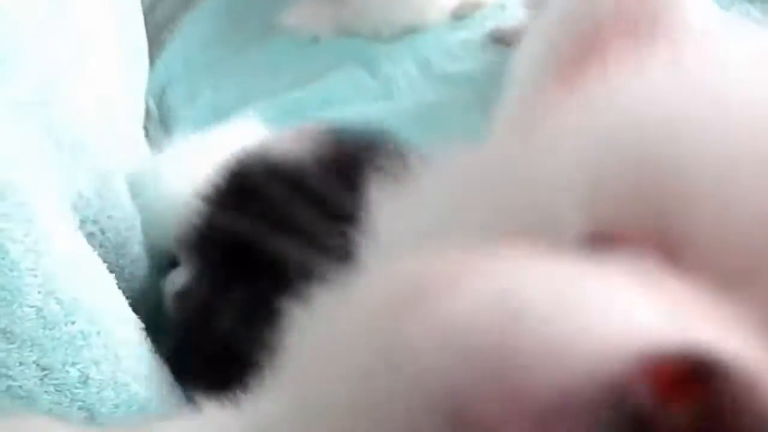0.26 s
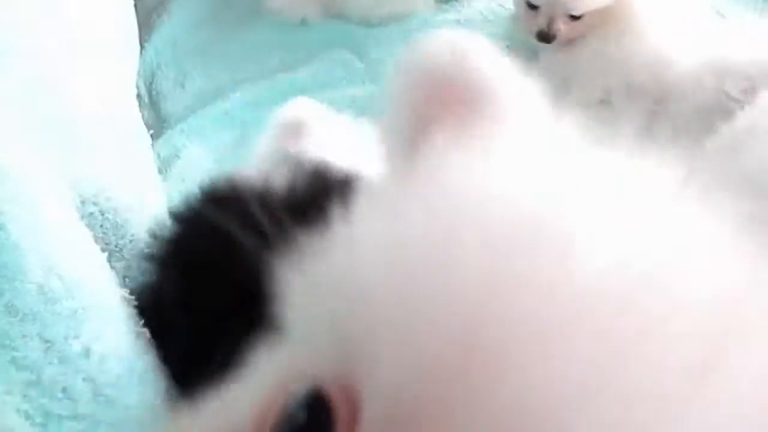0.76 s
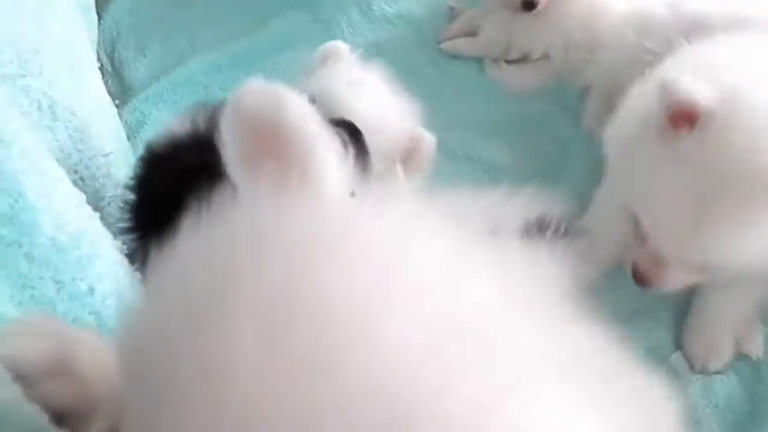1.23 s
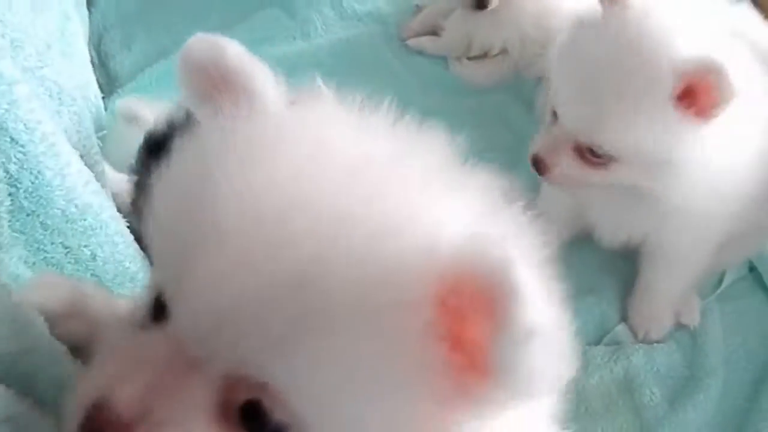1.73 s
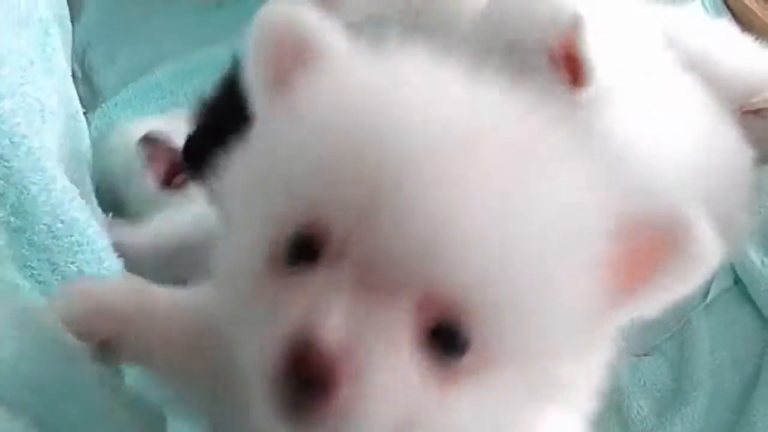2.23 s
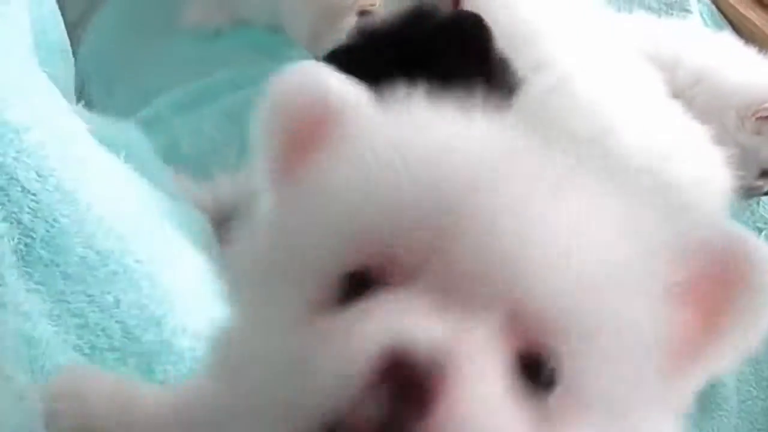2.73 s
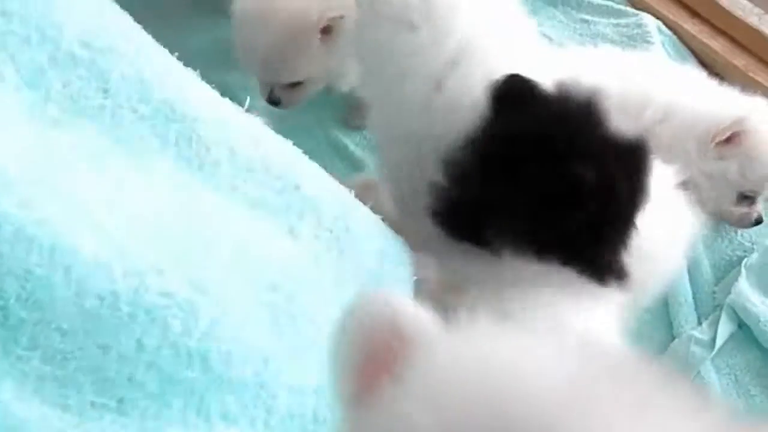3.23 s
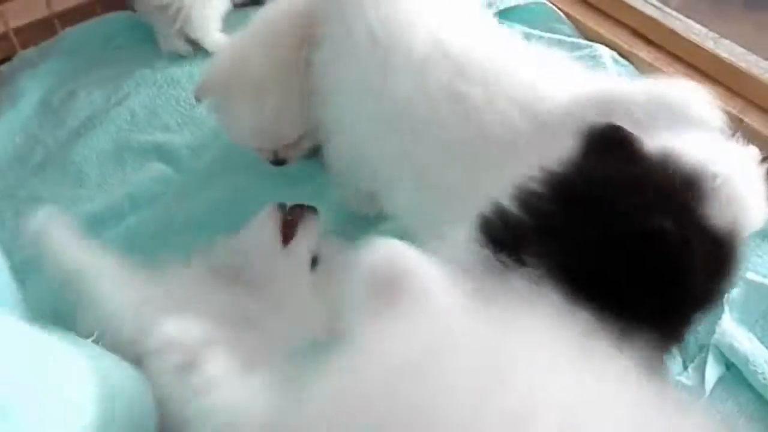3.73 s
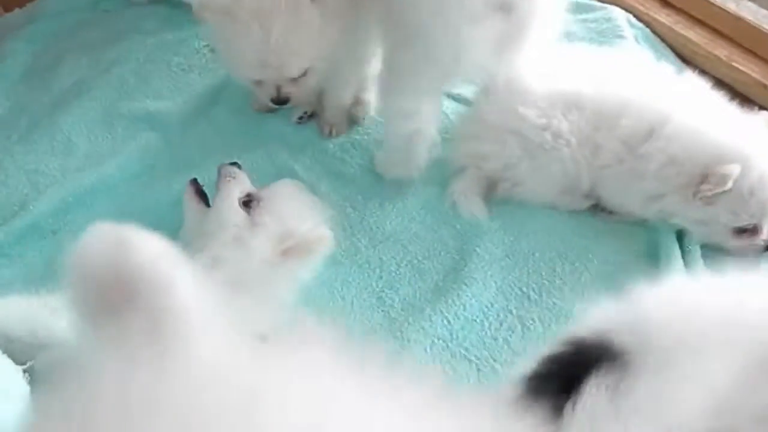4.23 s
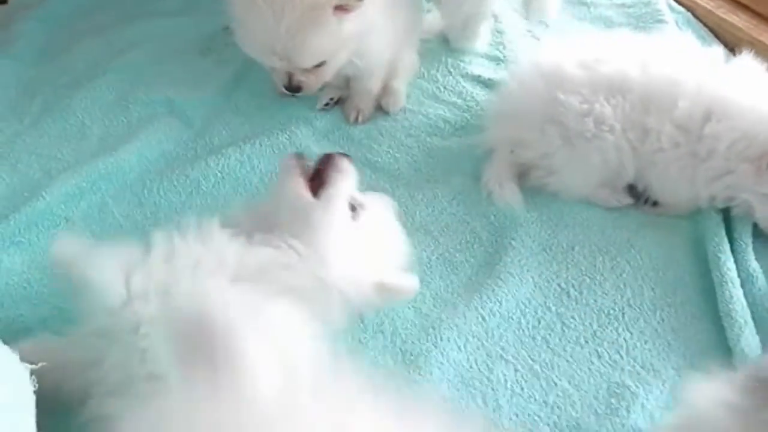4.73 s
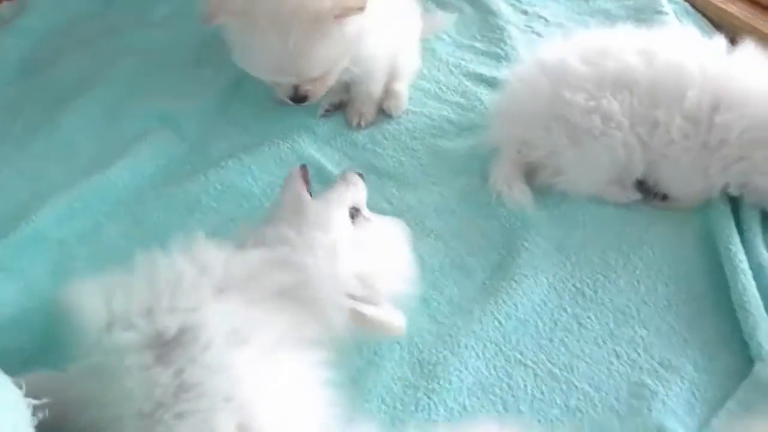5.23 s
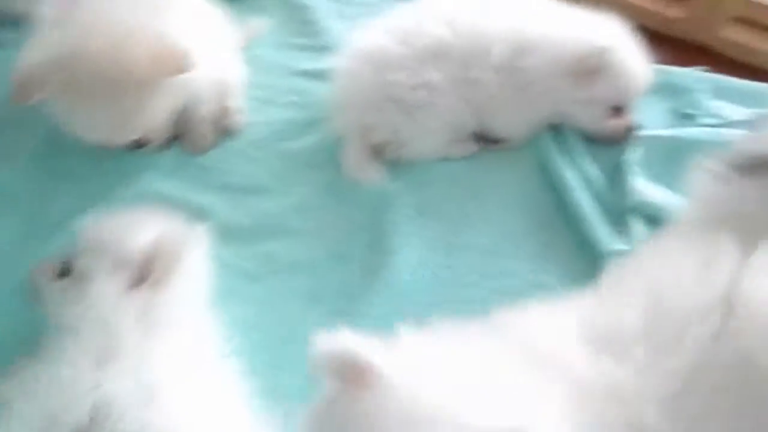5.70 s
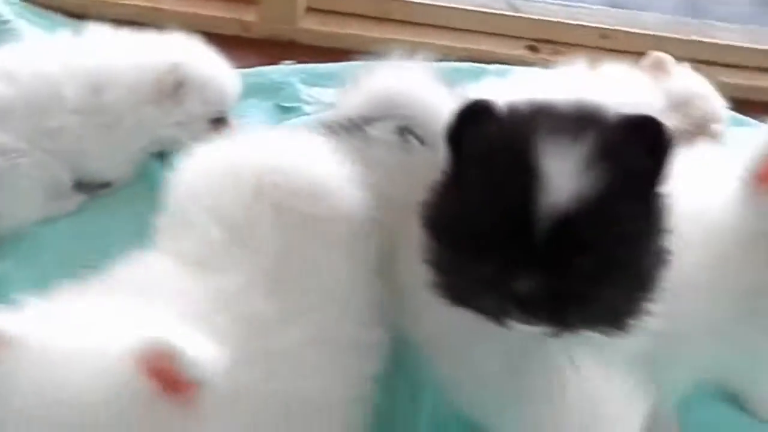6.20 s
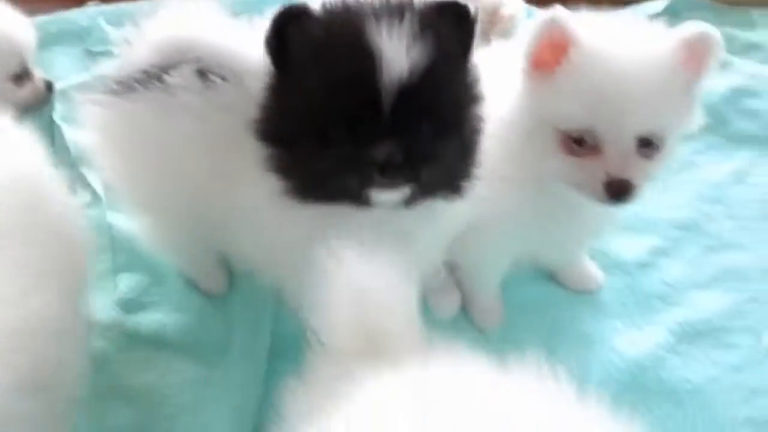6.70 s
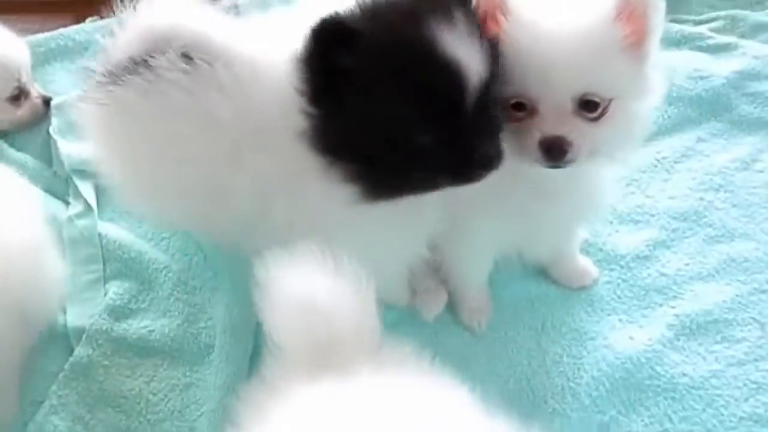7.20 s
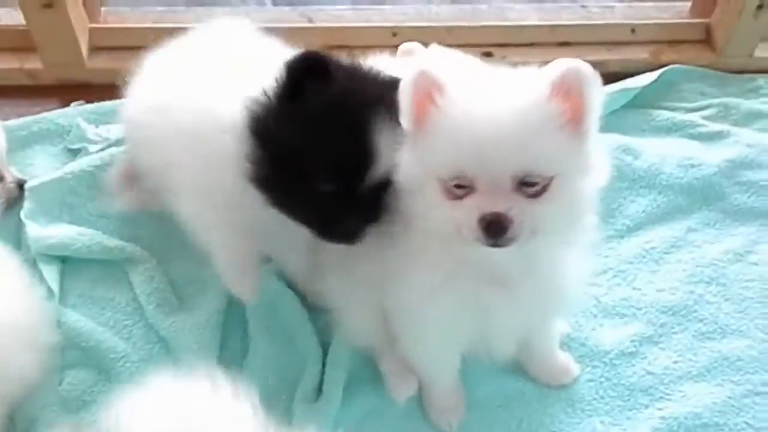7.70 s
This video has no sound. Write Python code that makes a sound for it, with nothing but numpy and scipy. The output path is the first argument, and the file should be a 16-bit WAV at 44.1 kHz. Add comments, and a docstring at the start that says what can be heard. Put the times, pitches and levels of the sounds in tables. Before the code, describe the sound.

Heard from very close in a small furnished room, a puppy yips sharply and bursts into a ragged, squeaky snarl with a hoarse bark. After a pause comes a soft closed-mouth moan, then a piercing thin whine that trembles and fades. Weaker whines, a short squeal and a tiny peep follow. Faint claw ticks and dull paw thuds on padding come later, over a low wavering appliance hum that dips under the first whine.

```python
"""An indoor pen: puppies play on a blanket, heard from close by.
One yelps, squeaks, snarls and growls, then whines follow in long thin squeals: all are stacks of
vocal-fold partials coloured by throat and mouth, with puffs of noise for the breath.
Claws tick and paws thud as short decaying noise bursts. An appliance hums as wavering tones over
noise for the room's air; this background dips for about a second under the first whine."""
import sys
import numpy as np
from scipy import signal
from scipy.fft import rfft, irfft, next_fast_len
from scipy.io import wavfile
from scipy.ndimage import uniform_filter1d

SR = 44100
rng = np.random.default_rng(int(sys.argv[2]) if len(sys.argv) > 2 else 0)


def wav_out(sig):
    """Save sig, one row per channel (or a flat mono array), as 16-bit PCM at SR to the path in sys.argv[1]."""
    wavfile.write(sys.argv[1], SR, np.round(np.clip(np.atleast_2d(sig).T, -1, 1) * 32767).astype(np.int16))


N = 350595
TIME = np.arange(N) / SR
TOP_HZ = 15850  # upper edge of the whole sound
# the snarl, which growls and also chops the high voice: t/s, f/Hz, fundamental level/dB
SNARL = [(0.29, 388, -26.5), (0.326, 333, -22.5), (0.362, 399, -31.5), (0.418, 363, -29),
         (0.442, 457.8, -21.5), (0.48, 417.7, -28.5), (0.51, 354.5, -17), (0.56, 504.8, -20),
         (0.59, 432.6, -26.5), (0.616, 412, -27), (0.666, 318, -21.5), (0.7, 354, -18.5),
         (0.782, 308.1, -28.5), (0.902, 301.6, -24), (0.94, 279, -36), (0.97, 255.3, -24)]


def gain_of(db):
    """Turns decibels into amplitude."""
    return 10 ** (np.asarray(db) / 20)


def evened(x):
    """Scales a signal to rms 1."""
    return x / np.sqrt(np.mean(x ** 2) + 1e-20)


def colour(points, hz):
    """Reads the gain of a spectrum table at these frequencies, along a log-frequency axis."""
    table_hz, db = np.transpose(points)
    return gain_of(np.interp(np.log(hz + 1), np.log(table_hz), db))


def noise(points, size):
    """Noise of rms 1, filtered to the colour of a spectrum table."""
    spectrum = rfft(rng.standard_normal(size))
    shape = colour(points, np.fft.rfftfreq(size, 1 / SR))
    return evened(irfft(spectrum * shape, size))


def wander(rate_hz, size):
    """Random drift of rms about 1, mostly slower than the rate."""
    padded = next_fast_len(size + 4096)  # spare length keeps the two ends from joining up
    hz = np.fft.rfftfreq(padded, 1 / SR)
    slowed = rfft(rng.standard_normal(padded)) / (1 + (hz / rate_hz) ** 4)
    return evened(irfft(slowed, padded)[:size])


def add(mix, s, sound):
    """Mixes a sound in at a time in seconds."""
    part = mix[round(s * SR):][:len(sound)]
    part += sound[:len(part)]


def controls(rows):
    """Draws a call's curves: its sample times, then each column sample by sample."""
    s, *columns = np.transpose(rows)
    t = np.arange(s[0], s[-1], 1 / SR)
    return t, *[np.interp(t, s, c) for c in columns]


def envelope(t, attack_s, release_s):
    """Straight attack, hold and release over a call."""
    attack = np.clip((t - t[0]) / attack_s, 0, 1)
    return attack * np.clip((t[-1] - t) / release_s, 0, 1)


def folds(hz, low_db, upper_db, shut, opened, mouth, jitter, shimmer, rasp, flutter_hz, count,
          patchy_db=3.5, blur_hz=8000):
    """Vocal folds: the lowest partials have their own levels, the rest take the mouth's colour."""
    size = len(hz)
    phase = 2 * np.pi * np.cumsum(hz * (1 + jitter * wander(flutter_hz, size))) / SR
    order = np.arange(1, count + 1)[:, None]
    upper_hz = order[len(low_db):] * hz
    upper = colour(shut, upper_hz) ** (1 - mouth) * colour(opened, upper_hz) ** mouth
    upper *= upper_hz < TOP_HZ
    # overtones come and go as the head moves
    upper *= gain_of(patchy_db * np.array([wander(34, size) for _ in upper_hz]))
    # the highest overtones weaken
    upper /= (1 + (upper_hz / blur_hz) ** 4) ** .5
    # together the overtones carry the upper level
    upper *= gain_of(upper_db) / np.linalg.norm(upper, axis=0)
    heights = np.vstack([gain_of(low_db), upper])
    # uneven cycles make every partial flutter
    flutter = 1 + shimmer * np.array([wander(flutter_hz, size) for _ in order])
    flutter /= np.sqrt(1 + shimmer ** 2)
    tone = np.sqrt(2) * (heights * flutter * np.sin(order * phase)).sum(0)
    # air escapes in a puff at each opening, in uneven spurts
    air = (1 - mouth) * noise(shut, size) + mouth * noise(opened, size)
    spurts = 1 + .5 * wander(flutter_hz, size)
    puffs = rasp * gain_of(upper_db) * air * (1 + np.cos(phase)) * spurts
    return (tone + puffs) * signal.windows.tukey(size, min(1, 0.0033 * SR / size))


def background_level():
    """Background gain: settles from a slightly high start, dips quickly once, recovers slowly."""
    dip_s, fall_s, dip_db, recover_s, bow = 2.52, 0.04, -15.5, 1.22, 1.78
    level_db, start_db, start_fade_s, drift_db_per_s = -0.41, 3.5, 0.45, -0.1852
    fall = np.clip((TIME - dip_s) / fall_s, 0, 1)
    recovered = np.clip((TIME - dip_s) / recover_s, 0, 1) ** bow
    settling_db = level_db + start_db * np.exp(-TIME / start_fade_s)
    settling_db += drift_db_per_s * (TIME - TIME.mean())
    return gain_of(settling_db + dip_db * fall * (1 - recovered))


def background(treble_depth=1.3):
    """Appliance hum lines, each wavering in level and phase, over room air and a soft hiss."""
    # the appliance's hum: f/Hz, level/dB before the background level, wavering share
    hum_lines = [(125.85, -35, .25), (114.3, -38, 0.78), (45.1, -40.5, 0.76), (239.8, -57.5, 0.26),
                 (751, -58, 0.96)]
    # the room's air: f/Hz, relative level per Hz/dB
    air_colour = [(20, -1), (50, 3.5), (80, -0.5), (190, -1.5), (300, -6.5), (500, -8), (850, -15.5),
                  (1200, -26), (2600, -30.5), (4500, -44.5), (6500, -46), (8300, -37.5), (11500, -57.5),
                  (15600, -44.5)]
    # a soft hiss that swells and fades: t/s, level/dB
    hiss_level = [(0, -35.5), (1, -34.5), (1.4, -43), (1.65, -66), (2.12, -42), (2.48, -46.5), (2.62, -100)]
    # the hiss's colour: f/Hz, relative level per Hz/dB
    hiss_colour = [(200, 0), (700, 6.5), (1200, -0.5), (2100, 0), (3000, -5.5), (4000, -14), (8300, -19),
                   (11500, -36), (15500, -33.5)]
    hum, level = np.zeros(N), background_level()
    for hz, db, waver in hum_lines:
        drift = 1 - waver + waver * (wander(5.9, N) + 1j * wander(2.3, N))
        line = drift * np.exp(2j * np.pi * (hz * TIME + rng.random()))
        hum += gain_of(db) * evened(line.real)
    air = gain_of(-35.5) * noise(air_colour, N)
    high_pass = signal.butter(2, 3000, "high", fs=SR, output="sos")
    treble = signal.sosfiltfilt(high_pass, air)
    hiss = gain_of(np.interp(TIME, *np.transpose(hiss_level))) * noise(hiss_colour, N)
    # the treble follows the level more steeply, so it sinks further in the dip
    return level * (hum + air - treble) + level ** treble_depth * treble + hiss


def cry(t, hz, first_db, octave_db, upper_db, rough, throb=0.13):
    """The high voice; the slower snarl chops it and gives it sidebands."""
    # throat colour: f/Hz, relative level/dB
    throat = [(900, -10), (1600, -11), (2500, 11.5), (3200, -1), (4400, -8), (5700, -24.5), (8000, -9),
              (10500, -33.5), (15500, -44.5)]
    voice = folds(hz, [first_db, octave_db], upper_db, throat, throat, 0.71, jitter=.094 * rough,
                  shimmer=1.4 * rough, rasp=2.2 * rough, flutter_hz=300, count=16)
    snarl_s, snarl_hz, _ = np.transpose(SNARL)
    snarl_phase = 2 * np.pi * np.cumsum(np.interp(t, snarl_s, snarl_hz)) / SR
    depth = np.clip(throb * np.sqrt(abs(rough)) * (t > snarl_s[0]), 0, 1)
    return voice * (1 + depth * np.cos(snarl_phase)) / np.sqrt(1 + depth ** 2 / 2)


def yelps(scoop_s=0.0033, follows=.03, attack_s=0.0028):
    """A yip and a hoarse bark: effort drives the overtones, the fundamental hardly changes."""
    # curve of the yip: t/s, f/Hz before the scoop, effort/dB
    YIP = [(0.188, 975, -28.5), (0.2, 878, -27), (0.212, 1055, -9.5), (0.222, 1065, -11),
           (0.24, 1110, -18.5), (0.26, 888, -27), (0.3, 884, -41)]
    # curve of the bark: t/s, f/Hz, effort/dB
    BARK = [(0.544, 907.6, -26), (0.554, 905, -23.5), (0.572, 888, -17), (0.588, 1053, -16),
            (0.614, 903, -24.5), (0.626, 784, -34), (0.65, 749.6, -36)]
    # yelps: curve, fundamental level/dB, octave re effort/dB, upper overtones re effort/dB,
    # roughness 0-1, opening scoop/share of pitch
    calls = [(YIP, -17.5, 0, -9.5, 0.12, .22), (BARK, -17.5, -2.3, -0.5, 0.34, 0)]
    out = np.zeros(N)
    for rows, first_db, octave_db, upper_db, rough, scoop in calls:
        t, hz, effort = controls(rows)
        hz = hz * (1 + scoop * np.exp(-(t - t[0]) / scoop_s))
        fundamental = first_db + follows * (effort - effort.mean())
        voice = cry(t, hz, fundamental, effort + octave_db, effort + upper_db, rough)
        add(out, t[0], voice * envelope(t, attack_s, release_s=.025))
    return out


def squeaks():
    """Squeaks break through the snarl, each one short arch of pitch and level."""
    # squeaks: middle t/s, length/s, top f/Hz, peak fundamental level/dB,
    # octave re fundamental at the peak/dB, roughness 0-1
    calls = [(.3, 0.05, 836, -22, -33, 0.06), (0.327, 0.023, 1292, -23, -7.5, 0.04),
             (0.363, 0.035, 1254, -19, -5.5, 0.13), (0.392, .04, 1121, -21, -15.5, 0.4),
             (0.421, .034, 1191, -19, -7, .15), (0.454, 0.041, 931, -23.5, -28, 0.4),
             (0.493, .042, 1280, -21, -5, 0.17)]
    sag, fade_db = .25, -5.5  # share of pitch, and level, lost toward both ends
    upper_db = -40  # overtones re fundamental
    out = np.zeros(N)
    for middle, length, top_hz, db, octave_db, rough in calls:
        t = middle + np.arange(-length / 2, length / 2, 1 / SR)
        edge = (2 * (t - middle) / length) ** 2
        level = db + fade_db * edge
        octave = level + octave_db + fade_db * edge  # fades twice as far
        voice = cry(t, top_hz * (1 - sag * edge), level, octave, level + upper_db, rough)
        add(out, t[0], voice)
    return out


def growls():
    """The low voice: an open, ragged snarl that settles, then cleaner moans, the mouth more shut."""
    # curves of the moans that follow the snarl, each: t/s, f/Hz, fundamental level/dB
    MOAN = [(1.745, 360, -29), (1.763, 357.5, -24.5), (1.813, 344, -25), (1.863, 359.8, -24),
            (1.943, 344, -25), (2.011, 306, -29), (2.049, 321, -29.5), (2.091, 308, -29),
            (2.179, 349.4, -24), (2.215, 331.4, -22.5), (2.269, 300, -36.5), (2.315, 321.7, -29.5),
            (2.333, 336, -31), (2.36, 360, -41.5)]
    # a faint moan: t/s, f/Hz, fundamental level/dB
    FAINT_MOAN = [(2.74, 334, -40.5), (2.794, 307.8, -54), (2.936, 338, -40.5), (3.004, 287, -50),
                  (3.07, 292, -46)]
    # a murmur: t/s, f/Hz, fundamental level/dB
    MURMUR = [(3.185, 333, -65), (3.214, 317, -44.5), (3.26, 291, -54.5)]
    # growls: curve, overtones re level/dB, settled mouth opening 0-1, settled roughness 0-1
    calls = [(SNARL, -5, .42, .08), (MOAN, -7, 0, .07), (FAINT_MOAN, -11, 0.35, 0.3),
             (MURMUR, -12, .2, .15)]
    # open mouth's colour: f/Hz, relative level/dB
    opened = [(400, -7.5), (950, 7.5), (1250, 4), (1550, -22.5), (2200, -7.5), (2600, -0.5), (2950, -45.5),
              (8000, -45)]
    # shut mouth's colour: f/Hz, relative level/dB
    shut = [(650, 4), (1000, -5.5), (1350, -31), (1850, -23), (2500, -32), (8000, -61)]
    snarl_end_s, settle_s = .62, .07
    snarl_mouth, snarl_rough, snarl_bright_db = 0.87, 0.644, 5
    nasal_hz, nasal_db_per_hz = 325, -0.16
    smooth_s = .04  # overtones swell more slowly than the fundamental
    out = np.zeros(N)
    for rows, overtones_db, calm_mouth, calm_rough in calls:
        t, hz, level = controls(rows)
        anger = np.clip(1 - (t - snarl_end_s) / settle_s, 0, 1)
        mouth = np.clip(calm_mouth + anger * (snarl_mouth - calm_mouth), 0, 1)
        rough = np.clip(calm_rough + anger * (snarl_rough - calm_rough), 0, 1)
        upper = uniform_filter1d(level, max(1, round(smooth_s * SR)))
        upper += overtones_db + snarl_bright_db * anger
        # with the mouth shut, a higher moan is purer
        upper += nasal_db_per_hz * (hz - nasal_hz) * (1 - mouth) ** 2
        voice = folds(hz, [level], upper, shut, opened, mouth, jitter=.12 * rough ** 2,
                      shimmer=.7 * rough ** 2, rasp=0.4 * rough, flutter_hz=184, count=12,
                      patchy_db=2.5)
        add(out, t[0], voice * envelope(t, attack_s=0.0091, release_s=0.02))
    return out


def claws():
    """Claws tick and scratch on the cloth: narrow noise bursts that die away at once."""
    # claws and small scratches: t/s, level before decay/dB, centre f/Hz, decay/s
    ticks = [(0.317, -29, 4100, 0.0013), (3.754, -48.5, 5150, 0.012), (5.541, -50, 6930, .002),
             (7.214, -54.5, 9400, 0.015), (7.72, -56, 4540, 0.0027)]
    out, t = np.zeros(N), np.arange(SR // 4) / SR
    for s, db, hz, decay in ticks:
        scratch = noise([(hz / 2, -16), (hz, 0), (hz * 2, -22)], len(t))
        add(out, s, gain_of(db) * scratch * np.exp(-t / decay))
    return out


def tremble(t):
    """Short bursts of trembling pitch, as a share of the pitch."""
    # trembles: middle t/s, depth/share of the pitch
    bursts = [(2.69, .025), (2.88, 0.026)]
    rate_hz, spread_s = 22.2, .04
    ripple = np.zeros(len(t))
    for s, depth in bursts:
        swell = np.exp(-((t - s) / spread_s) ** 2)
        ripple += depth * np.cos(2 * np.pi * rate_hz * (t - s)) * swell
    return ripple


def whines(nose_swell_s=0.071):
    """Thin squeals with strong octaves, nasal with the mouth shut, raspy as the puppy strains."""
    # curves of the whines, each: t/s, f/Hz before the pitch ripples, effort = octave level/dB
    LONG_WHINE = [(2.517, 1390, -28), (2.529, 1217, -24), (2.547, 1251, -23), (2.563, 1664, -33.5),
                  (2.587, 1900, -46), (2.605, 1901, -52.5), (2.659, 1546, -41), (2.739, 1591, -33),
                  (2.767, 1512, -23.5), (2.801, 1617, -33.5), (2.823, 1675, -51.5), (2.871, 1525, -63),
                  (2.957, 1422, -38), (3.021, 1444, -32), (3.105, 1495, -38.5), (3.129, 1597, -59),
                  (3.177, 1514, -57), (3.211, 1608, -67), (3.227, 2020, -71), (3.24, 1888, -66)]
    RISING_WHINE = [(3.44, 1265, -49), (3.454, 1122, -48), (3.468, 1193, -42.5), (3.488, 1394, -49),
                    (3.516, 1386, -54.5), (3.568, 1393, -49.5), (3.682, 1436, -36.5), (3.72, 1494, -36),
                    (3.745, 1520, -55)]
    FADING_WHINE = [(4.25, 1273, -54), (4.27, 1187, -42), (4.29, 1334, -49.5), (4.386, 1283, -44),
                    (4.436, 1420, -61.5), (4.512, 1306, -48), (4.556, 1440, -60), (4.612, 1370, -56),
                    (4.63, 1484, -72)]
    SQUEAL = [(4.737, 1350, -38), (4.749, 1247, -27.5), (4.771, 1323, -32), (4.783, 1467, -31),
              (4.827, 1643, -53), (4.835, 1583, -53)]
    PEEP = [(5.133, 1325, -63), (5.142, 1050, -61), (5.212, 1256, -67)]
    # whines: curve, fundamental offset/dB, share of effort that the fundamental follows,
    # upper overtones re effort with the mouth open/dB, nose hiss peak/dB,
    # mouth opening 0-1 at start, at end, roughness 0-1 at start, at end
    calls = [(LONG_WHINE, -1.5, 0.17, -9, -80, 0.87, 0.087, 0.33, 0.088),
             (RISING_WHINE, -1.2, 0.53, -1.2, -71, 0.37, 0.13, 0.33, 0.71),
             (FADING_WHINE, -0.74, 0.71, -8, -61.5, 0.56, 0.69, 0.66, .6),
             (SQUEAL, 1, .2, -14, -78, 0.9, 0.76, 0.62, 0.62), (PEEP, -2.5, 0, -2, -66, 0.99, .9, 0.55, .5)]
    # the fundamental as it glides through the muzzle's resonances: f/Hz, level before offset/dB
    muzzle = [(1050, -36), (1200, -42), (1290, -49.5), (1365, -53.5), (1450, -48), (1560, -44),
              (1700, -48.5), (2000, -45.5)]
    # open mouth's colour: f/Hz, relative level/dB
    opened = [(3600, 6), (4800, -11), (6000, -20), (7800, -13.5), (9300, -21), (11500, -27), (13000, -29),
              (15300, -16)]
    # shut mouth's colour: f/Hz, relative level/dB
    shut = [(3500, -35), (4400, -26), (5800, 3), (7200, -1), (8600, -18), (10200, -21), (12000, -33),
            (15000, -20)]
    # air hissing through the nose early in a whine: f/Hz, relative level per Hz/dB
    nose_colour = [(3000, -40), (10000, -19), (11600, -2), (12800, -1), (14000, -9), (15800, -13)]
    move_at, move_s = 0.466, .02  # share of the whine at which the mouth moves, and how quickly
    flick, flick_s = 0.154, 0.0075  # the pitch flicks up by this share as a whine dies
    quaver, quaver_hz = .006, 24  # random share of the pitch, and its rate
    shut_muffles_db = -9  # a shut mouth holds back the upper overtones
    out = np.zeros(N)
    for (rows, offset_db, follows, upper_db, nose_db,
         mouth_start, mouth_end, rough_start, rough_end) in calls:
        t, hz, effort = controls(rows)
        flick_up = flick * np.exp((t - t[-1]) / flick_s)
        hz = hz * (1 + tremble(t) + flick_up + quaver * wander(quaver_hz, len(t)))
        moved = (1 + np.tanh((t - t[0] - move_at * np.ptp(t)) / move_s)) / 2
        mouth = np.clip(mouth_start + (mouth_end - mouth_start) * moved, 0, 1)
        rough = np.clip(np.linspace(rough_start, rough_end, len(t)), 0, 1)
        first_db = np.interp(hz, *np.transpose(muzzle)) + offset_db
        first_db += follows * (effort - effort.mean())
        upper = effort + upper_db + shut_muffles_db * (1 - mouth)
        voice = folds(hz, [first_db, effort], upper, shut, opened, mouth, jitter=0.0194 * rough,
                      shimmer=0.19 * rough, rasp=.8 * rough, flutter_hz=278, count=12,
                      blur_hz=7300)
        age = (t - t[0]) / nose_swell_s
        hiss = gain_of(nose_db) * noise(nose_colour, len(t)) * age * np.exp(1 - age)
        add(out, t[0], (voice + hiss) * envelope(t, attack_s=0.0016, release_s=0.0054))
    return out


def paws():
    """Paws thud on the padded floor: dull noise with a soft onset and a quick decay."""
    # soft thuds: t/s, level before onset and decay/dB, upper edge f/Hz, decay/s
    thuds = [(4.7, -18, 82, 0.027), (4.768, -18, 80, 0.016), (4.978, -24, 90, 0.033),
             (5.871, -32, 860, 0.037), (5.909, -27.5, 400, 0.03), (6.051, -30, 350, 0.034)]
    out, t = np.zeros(N), np.arange(SR // 4) / SR
    for s, db, hz, decay in thuds:
        push = noise([(hz / 8, -6), (hz / 2, 0), (hz, -2), (hz * 2, -22), (hz * 20, -95)], len(t))
        onset = 1 - np.exp(-t / 0.0022)
        add(out, s, gain_of(db) * push * np.exp(-t / decay) * onset)
    return out


def room(x, t60=0.3, wet_db=-21):
    """A furnished room: a short, faint tail of decaying noise."""
    t = np.arange(SR // 2) / SR
    tail = noise([(200, 7), (3000, -7.5), (12000, -16.5)], len(t))
    tail *= gain_of(-60 * t / t60) * (t > .003)
    return x + gain_of(wet_db) * signal.fftconvolve(x, tail / np.linalg.norm(tail))[:N]


def scene():
    """The puppies in their pen, over the background."""
    puppies = yelps() + squeaks() + growls() + claws() + whines() + paws()
    return (room(puppies) + background())[None]


def record(dry):
    """Soft clipping rounds off the loudest peaks; then a low-pass limits the band."""
    held = dry / (1 + (dry / .75) ** 6) ** (1 / 6)
    low_pass = signal.firwin(511, TOP_HZ, window=("kaiser", 9), fs=SR)
    return signal.oaconvolve(held, low_pass[None], "same")


dry = scene()
out = record(dry)
wav_out(out)
```